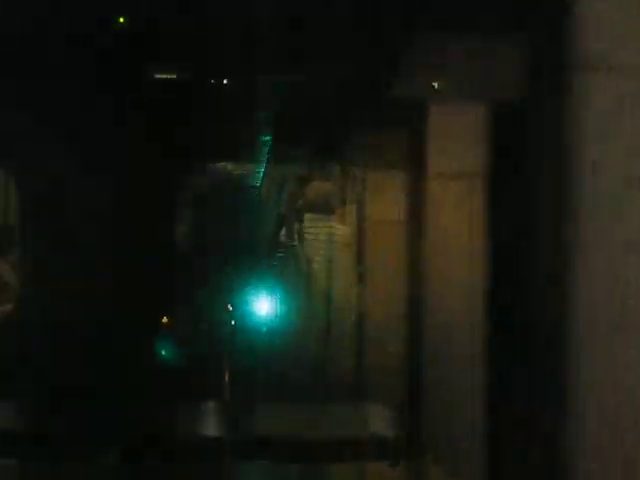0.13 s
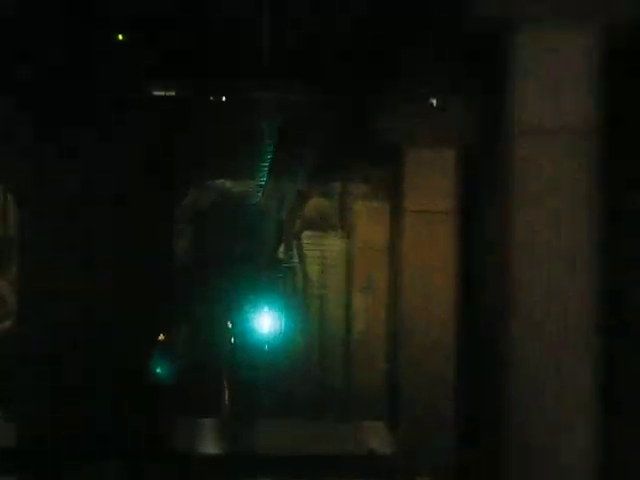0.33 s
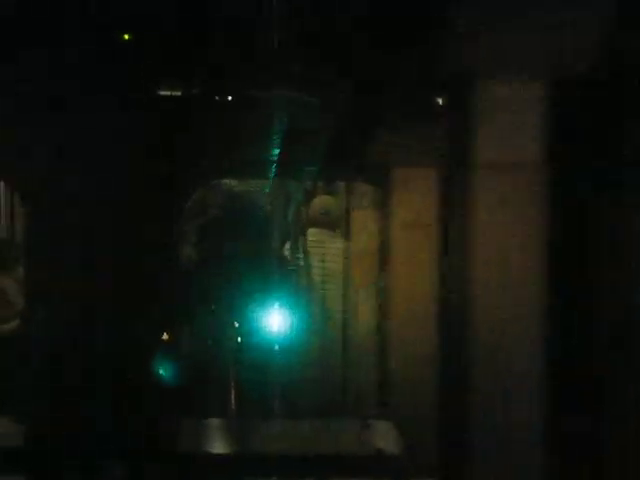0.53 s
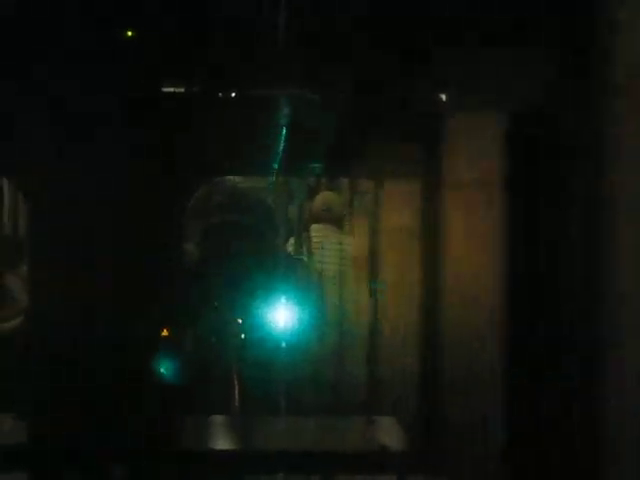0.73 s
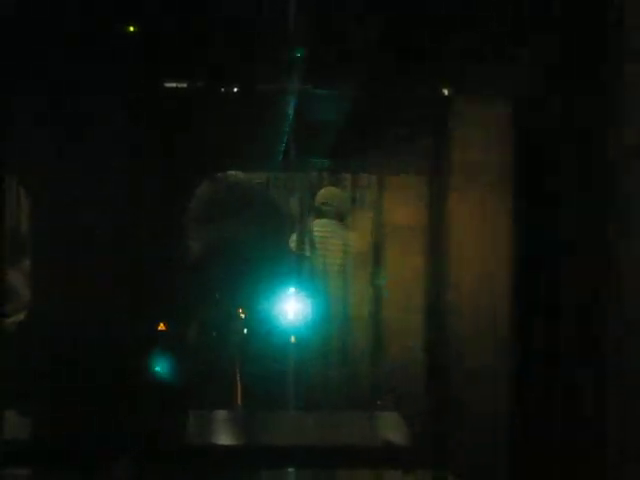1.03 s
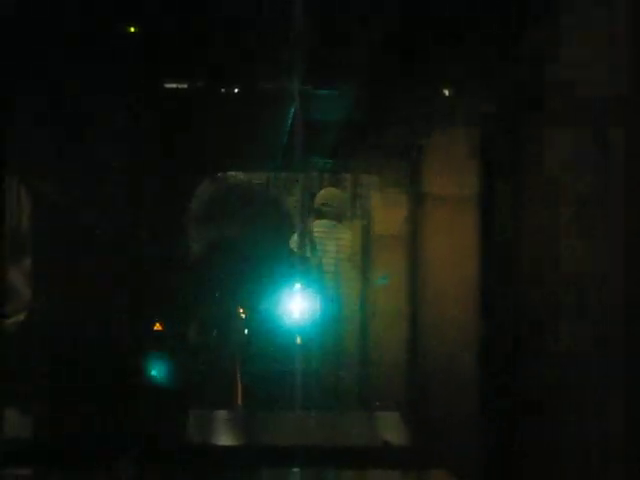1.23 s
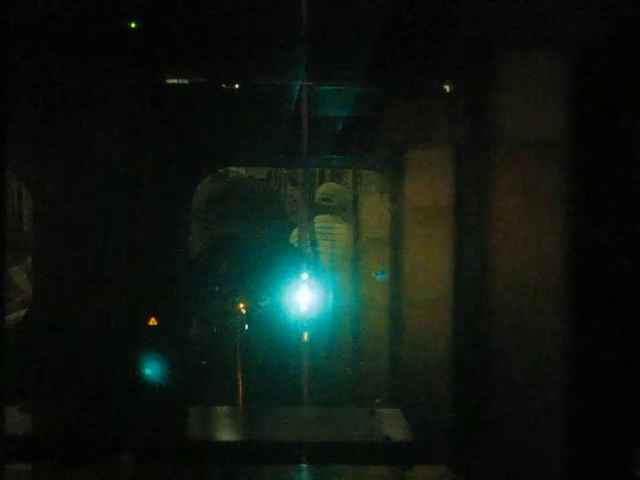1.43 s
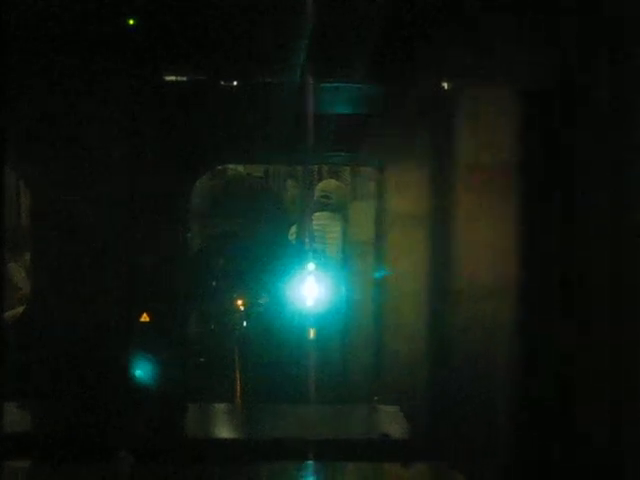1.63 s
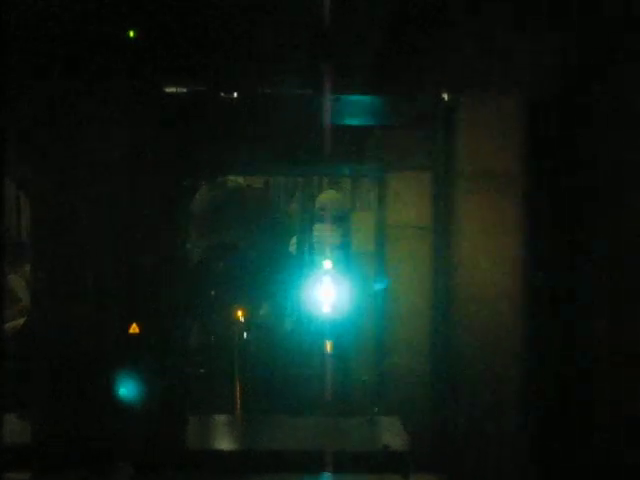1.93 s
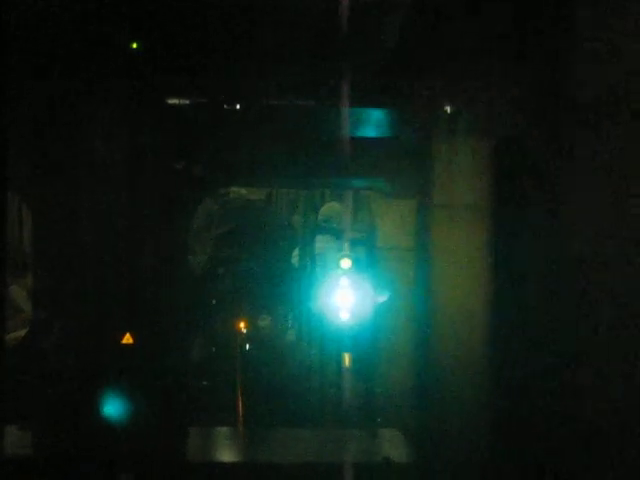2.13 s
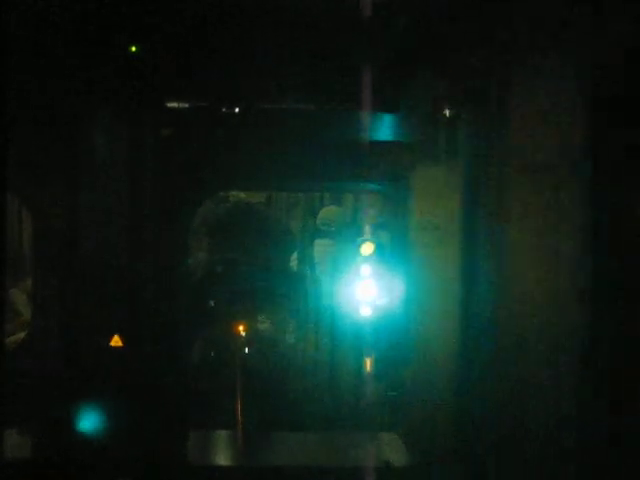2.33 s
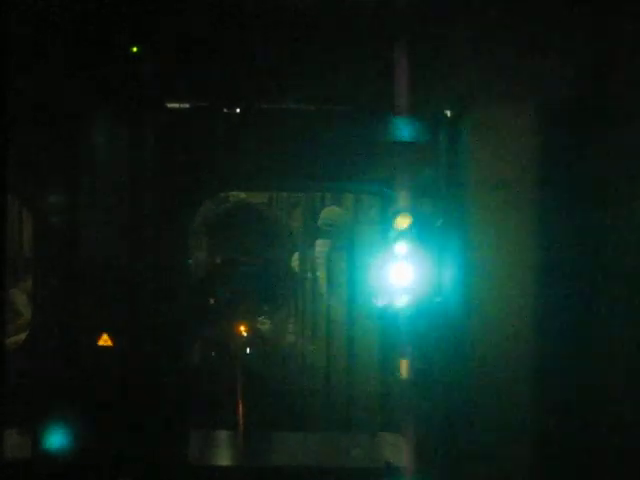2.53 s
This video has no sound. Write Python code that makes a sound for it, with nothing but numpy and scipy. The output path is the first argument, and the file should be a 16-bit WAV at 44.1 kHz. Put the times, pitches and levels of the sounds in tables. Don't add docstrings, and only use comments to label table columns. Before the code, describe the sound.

Steady wheel and rail roar inside a moving train in a tunnel, with a low motor hum dying away early, a brief recorder click midway, and the roar strongest at the end; muffled mono microphone.

```python
import sys
import numpy as np
from scipy import signal
from scipy.fft import rfft, irfft, next_fast_len
from scipy.io import wavfile
from scipy.ndimage import uniform_filter1d, map_coordinates

SR = 44100
rng = np.random.default_rng(int(sys.argv[2]) if len(sys.argv) > 2 else 0)


def transcribe(u):
    v = np.clip(np.atleast_2d(u).T, -1, 1)
    q = np.round(v * 32767).astype(np.int16)
    wavfile.write(sys.argv[1], SR, q)


def boost(x):
    u = np.asarray(x, float) / 20
    return 10 ** u


N = 118188

# (time [s], level [dB])
ROLLING_EFFORT = [
    (0, -25),
    (.25, -26.5),
    (.6, -26),
    (1.0, -22.5),
    (1.35, -23.5),
    (1.55, -23),
    (1.75, -22.5),
    (2.2, -23),
    (2.68, -21.5),
]


def unit(x):
    return x / np.sqrt(np.mean(x ** 2) + 1e-20)


def along(points, hz):
    f, v = np.transpose(points)
    return np.interp(np.log(hz + 1), np.log(f + 1), v)


def curves(rows):
    s, *columns = np.transpose(rows)
    t = np.arange(N) / SR
    return [np.interp(t, s, column) for column in columns]


def wobble(rate):
    knots = rng.standard_normal(int(N * rate / SR) + 4)
    return map_coordinates(knots, [np.arange(N) * rate / SR])


def filtered(x, response):
    m = next_fast_len(N + SR // 2)
    spectrum = rfft(x, m) * response(np.fft.rfftfreq(m, 1 / SR))
    return irfft(spectrum, m)[..., :N]


def patchy(patchy_db):
    z = signal.stft(rng.standard_normal(N), nperseg=1024)[2]
    field = uniform_filter1d(rng.standard_normal(z.shape), size=6, axis=0)
    field = uniform_filter1d(field, size=8, axis=1)
    return signal.istft(z * boost(patchy_db * unit(field)), nperseg=1024)[1][:N]


def coloured(spectrum, patchy_db):
    return unit(filtered(patchy(patchy_db), lambda hz: boost(along(spectrum, hz))))


def ringing(modes, patchy_db):
    def gain(f):
        power = 0
        for centre, width, db in modes:
            damping = (f * width) ** 2
            power = power + (boost(db) * damping / ((centre * centre - f * f) ** 2 + damping)) ** 2
        return np.sqrt(power)
    return unit(filtered(patchy(patchy_db), gain))


def narrow(hz, width_hz):
    steady = 0.6
    a, b = filtered(rng.standard_normal((2, N)), lambda f: 1 / (1 + (f / width_hz) ** 2))
    drift = (a + 1j * b) / np.abs(a + 1j * b) ** steady
    turn = 2 * np.pi * np.cumsum(hz * np.ones(N)) / SR
    return unit(np.real(drift * np.exp(1j * turn)))


def rolling():
    # (centre [Hz], width [Hz], level [dB])
    body_modes = [(147.7, 19, -8), (297.3, 48, -9), (340, 23, -11.5), (422, 51, -13.5), (552, 59, -7.5),
                  (710, 160, -4), (765, 110, -1.5), (851, 70, -5), (1023, 42, -16), (1088, 170, -13.5),
                  (1237, 63, -17)]
    # (frequency [Hz], density [dB per Hz])
    body_bed = [(88, -40.5), (150, -10.5), (309, -6), (473, -9.5), (754, -4), (956, -10.5), (1600, -31),
                (2080, -61), (3520, -120)]
    # (frequency [Hz], density [dB per Hz])
    air_hiss = [(760, -21), (1300, -3.5), (1580, -3.5), (2210, 0), (2950, -7.5), (3500, -12.5),
                (4300, -18.5), (5200, -22)]
    # (centre [Hz], width [Hz], level [dB])
    wheel_modes = [(1966, 130, -5), (2222, 360, -1), (2526, 120, -2), (3236, 120, -10), (4035, 130, -16),
                   (4850, 10, -20.5), (4800, 10, -26)]
    body_db, bed_db, air_db, wheel_db = -0.6, -2.5, -13.5, -19
    low_grows, air_grows, wheel_grows = 0.7, 0.54, 2.1

    effort_db, = curves(ROLLING_EFFORT)
    mean_db = effort_db.mean()
    swing_db = effort_db - mean_db
    roar = boost(body_db) * ringing(body_modes, patchy_db=0.5)
    roar += boost(bed_db) * coloured(body_bed, patchy_db=1.35)
    roar *= boost(low_grows * swing_db)
    air = boost(air_db + air_grows * swing_db + 0.51 * wobble(30)) * coloured(air_hiss, patchy_db=1.0)
    wheels = boost(wheel_db + wheel_grows * swing_db) * ringing(wheel_modes, patchy_db=0.44)
    return boost(mean_db - 0.43) * (roar + air + wheels)


def boom():
    # (time [s], level [dB], centre [Hz])
    floor_mode = [(0, -29.5, 72.05), (.2, -32, 76.25), (.42, -26.5, 76.16), (.6, -31.5, 74.15),
                  (.9, -29, 70.3), (1.15, -23.5, 67.43), (1.33, -26.5, 65.76), (1.5, -29.5, 79.5),
                  (1.75, -25.5, 71.7), (1.95, -26, 66.52), (2.15, -33, 79.17), (2.35, -25.5, 79.4),
                  (2.48, -42, 65.9), (2.62, -24, 56.4)]
    # (frequency [Hz], density [dB per Hz])
    floor_rumble = [(8.8, -39), (15, -2), (70, -3.5), (89, -7.5), (103, -4.5), (151, -16), (200, -21),
                    (260, -56.5), (440, -120)]
    level_db, hz = curves(floor_mode)
    mode = boost(level_db + 0.5) * narrow(hz, width_hz=6.9)
    return mode + boost(-28) * coloured(floor_rumble, patchy_db=0.5)


def rail():
    # (time [s], centre [Hz])
    song_pitch = [(0, 742), (.12, 789.6), (.3, 727.5), (.55, 750), (.78, 790), (1.05, 765), (1.22, 726),
                  (1.4, 785.8), (1.6, 750), (1.95, 746.6), (2.15, 791), (2.3, 718), (2.5, 790.5),
                  (2.68, 804)]
    effort_db, = curves(ROLLING_EFFORT)
    pitch_hz, = curves(song_pitch)
    return boost(effort_db - 12) * narrow(pitch_hz, width_hz=7)


def hum():
    # (time [s], pitch [Hz], level [dB])
    motor_tone = [
        (0, 94.7, -24),
        (.2, 96.2, -25.5),
        (.5, 96.55, -28),
        (.75, 96.5, -30.5),
        (.92, 97.4, -29),
    ]
    fade_db_per_s, shake_db = 39.5, -0.9
    hz, level_db = curves(motor_tone)
    after_s = np.maximum(np.arange(N) / SR - motor_tone[-1][0], 0)
    level_db = level_db - fade_db_per_s * after_s + shake_db * wobble(41)
    return np.sqrt(2) * boost(level_db) * np.sin(2 * np.pi * np.cumsum(hz) / SR)


def flange_squeal():
    # (multiple of the fundamental [1], level [dB])
    squeal_orders = [(2, 0), (3, -5)]
    start_hz, rise_hz_per_s, level_db, ends_s = 923, 500, -43, 0.08
    t = np.arange(N) / SR
    hz = start_hz + rise_hz_per_s * t + 12 * wobble(60)
    turn = 2 * np.pi * np.cumsum(hz) / SR
    tone = sum(boost(db) * np.sin(k * turn) for k, db in squeal_orders)
    return boost(level_db + 2.56 * wobble(50)) * tone * np.exp(-(t / ends_s) ** 4)


def panels():
    # (middle [s], half length [s], pitch [Hz], level [dB])
    panel_swells = [
        (.92, .13, 552, -34),
        (1.6, 0.17, 560, -32.5),
        (1.1, 0.62, 1110, -41.5),
        (0.77, 0.26, 297, -40.5),
        (2.58, 0.084, 268, -33.5),
        (2.58, .1, 305, -36.5),
    ]
    t = np.arange(N) / SR
    mix = boost(-42) * narrow(238, width_hz=2.5)
    for middle_s, half_s, hz, db in panel_swells:
        swell = np.exp(-((t - middle_s) / half_s) ** 2)
        mix = mix + boost(db) * swell * narrow(hz, width_hz=9)
    return mix


def scene():
    return (rolling() + boom() + rail() + hum() + flange_squeal() + panels())[None]


def low_pass(x):
    return signal.sosfilt(signal.butter(12, 15900, fs=SR, output="sos"), x)


def record(dry):
    # (frequency [Hz], gain [dB])
    mic_response = [(5200, 0), (5500, -4.5), (5750, -10.5), (5950, -18), (6150, -28), (6250, -36),
                    (6400, -90)]
    ceiling, knee, offset = 0.53, 2.5, -0.0038
    start_s, skip_s, skip_db, skip_heal_s = 0.002, 1.42329, -23.5, 0.0006
    t = np.arange(N) / SR
    held = dry / (1 + np.abs(dry / ceiling) ** knee) ** (1 / knee)
    held = held * np.minimum(t / start_s, 1)

    edge = SR // 10
    mirrored = np.pad(held, ((0, 0), (edge, edge)), mode="reflect")
    hz = np.fft.rfftfreq(mirrored.shape[1], 1 / SR)
    dull = irfft(rfft(mirrored) * boost(along(mic_response, hz)), mirrored.shape[1])[:, edge:-edge]

    from_skip = t - skip_s
    step = -boost(skip_db) * np.sign(from_skip) * np.exp(-np.abs(from_skip) / skip_heal_s)
    return low_pass(dull + offset + step)


dry = scene()
out = record(dry)
transcribe(out)
```